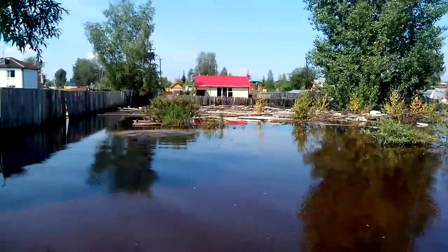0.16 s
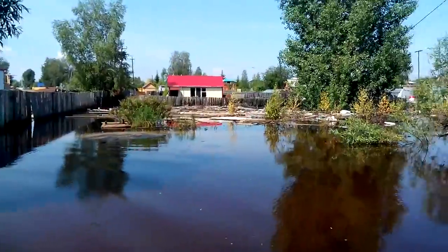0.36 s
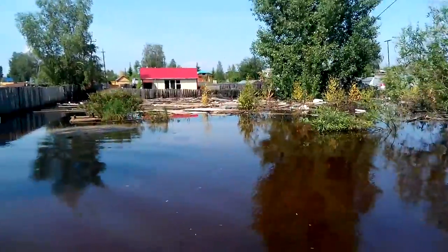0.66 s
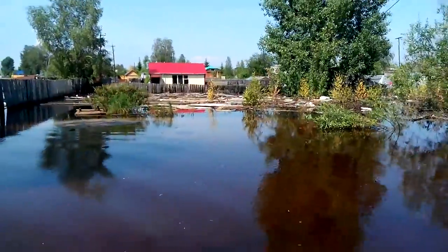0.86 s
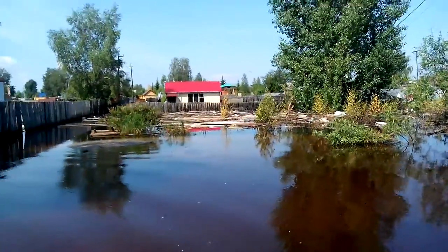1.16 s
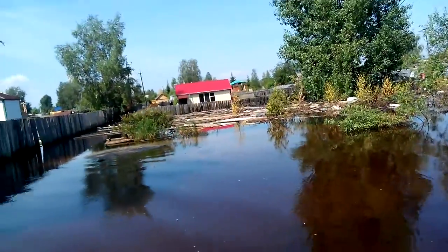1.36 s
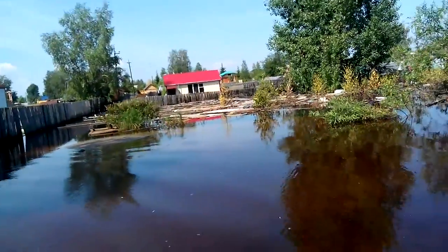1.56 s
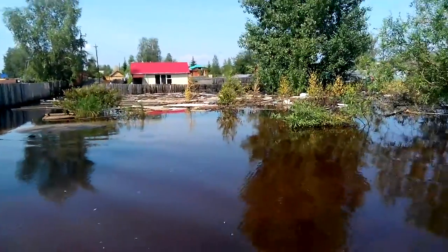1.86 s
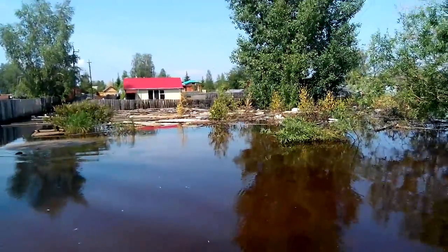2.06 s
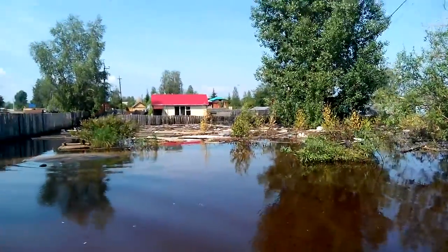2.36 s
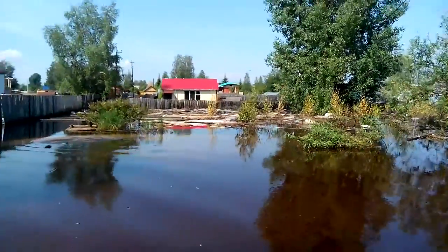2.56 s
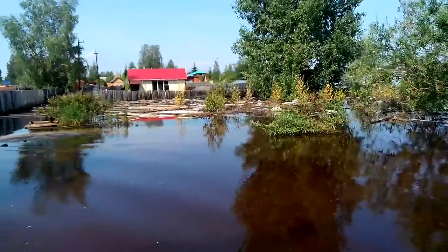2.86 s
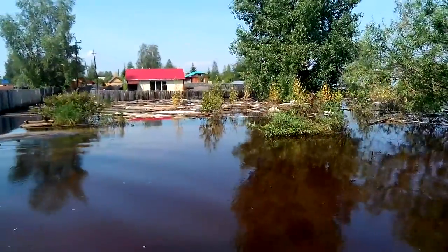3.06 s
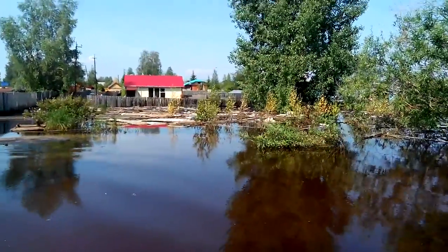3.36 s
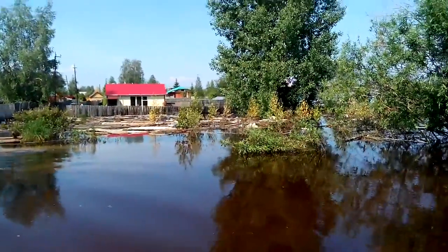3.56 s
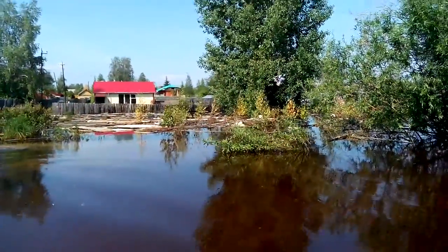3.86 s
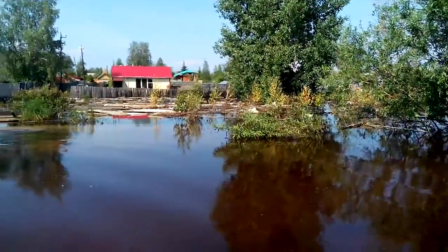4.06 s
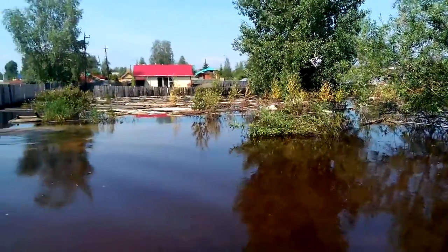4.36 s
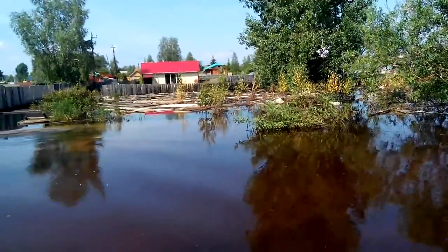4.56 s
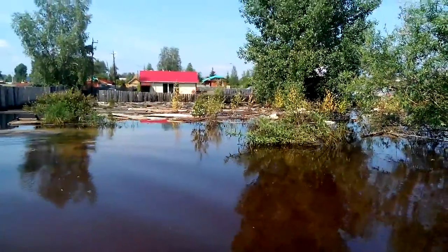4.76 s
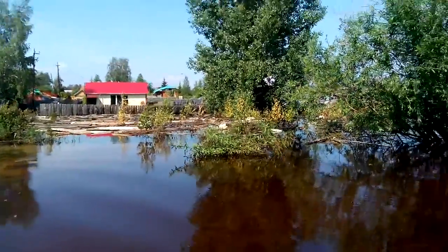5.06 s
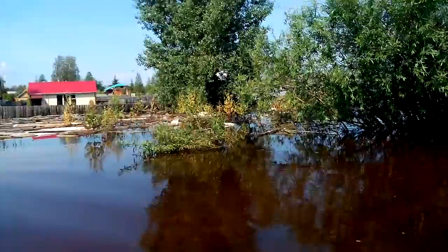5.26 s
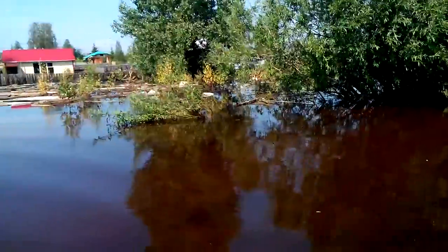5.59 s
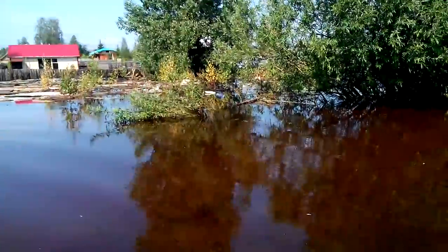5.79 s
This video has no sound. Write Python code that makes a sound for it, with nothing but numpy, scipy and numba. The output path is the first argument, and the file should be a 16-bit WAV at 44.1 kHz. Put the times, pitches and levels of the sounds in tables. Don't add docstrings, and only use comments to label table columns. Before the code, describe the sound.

Someone wades through knee-deep floodwater outdoors, eight steady strides of plunging, gurgling, churning splashes with bright drips scattered between them.

```python
import sys
import numpy as np
from scipy import signal
from scipy.fft import rfft, irfft
from scipy.io import wavfile
from scipy.ndimage import uniform_filter1d, map_coordinates
from numba import njit

SR = 44100
rng = np.random.default_rng(int(sys.argv[2]) if len(sys.argv) > 2 else 0)


def to_linear_factor(level_db):
    exponent = np.asarray(level_db, float) / 20
    return 10 ** exponent


def waveform_to_disk(signal):
    frames = np.transpose(np.atleast_2d(signal))
    scaled = np.clip(frames, -1, 1) * 32767
    samples = np.round(scaled).astype(np.int16)
    wavfile.write(sys.argv[1], SR, samples)


N = 261513


def shape(points, hz):
    f, db = np.transpose(points)
    return to_linear_factor(np.interp(np.log(np.maximum(hz, 1)), np.log(f), db))


def hiss(points):
    x = irfft(rfft(rng.standard_normal(N)) * shape(points, np.fft.rfftfreq(N, 1 / SR)), N)
    return x / np.std(x)


def walk(rate_hz):
    hold = int(SR / rate_hz)
    steps = np.repeat(rng.standard_normal(N // 40), hold)[:N]
    return uniform_filter1d(uniform_filter1d(steps, hold), hold // 2)


def at(curve, when):
    return curve[(when * N).astype(int)]


# freq_hz, level_db
CAPSULE_COLOUR = [(30, -16.5), (150, -8.5), (400, -3), (1900, 5.5), (4500, 2), (5600, 2.5), (6350, 5.5),
                  (7000, -4), (8000, -11), (11000, -17.5), (15500, -22), (20000, -21)]


def capsule(x):
    cep = irfft(np.log(shape(CAPSULE_COLOUR, np.fft.rfftfreq(2048, 1 / SR))))
    cep[1:1024] *= 2
    cep[1025:] = 0
    return signal.fftconvolve(x, irfft(np.exp(rfft(cep)))[:512])[:N]


@njit
def ring(n, start, hz, cycles, rise, size, swell):
    out = np.zeros(n)
    for e in range(len(start)):
        tau = cycles[e] * SR / hz[e] / 4
        step, glide, phase = 2 * np.pi * hz[e] / SR, 2 ** (rise[e] / (4 * tau)), 0.
        for i in range(min(int(8 * tau), n - start[e])):
            u = i / tau
            out[start[e] + i] += size[e] * u ** swell * np.exp(1.5 * (1 - u)) * np.sin(phase)
            phase += step
            step = min(step * glide, 2.8)
    return out


def bubbles(s, hz, cycles, rise_oct, size, swell=1.5):
    rise_oct = rise_oct + 0 * s
    cycles = np.maximum(cycles, .5) + 0 * s
    start = (s * SR).astype(np.int64)
    return ring(N, start, hz * 2 ** (-rise_oct / 4), cycles, rise_oct, size, max(1. * swell, .1))


def lone_bubbles(s, db, hz, cycles, rise_oct):
    return bubbles(s, hz, cycles, rise_oct, to_linear_factor(db) / shape(CAPSULE_COLOUR, hz))


def slaps(s, db, decay_s, colour):
    strike, u = np.zeros(N), np.arange(500) / (decay_s * SR)
    strike[(s * SR).astype(int)] = to_linear_factor(db)
    return np.convolve(strike, u * np.exp(1 - u))[:N] * hiss(colour)


def tent(t, start, end, db, rise, fall):
    t = t[:, None]
    return np.sum(to_linear_factor(db - rise * np.maximum(start - t, 0) - fall * np.maximum(t - end, 0)) ** 2, axis=1)


HOLLOW_RISE_DB_S, HOLLOW_FALL_DB_S, WAKE_FALL_DB_S = 456, 185, 217
# start_s, end_s, level_db, sag_db_per_s
WAKE_ROLLS = [
    (0.0, 0.234, -43.5, -2),
    (0.74, 1.127, -42.5, 38),
    (1.388, 1.82, -41, 16.5),
    (2.26, 2.58, -42.5, 27),
    (2.98, 3.269, -41.5, 4),
    (3.717, 4.06, -43, 2.5),
    (4.48, 4.85, -42.5, -1),
    (5.208, 5.65, -43.5, 20),
]


def wakes(t):
    start, end, db, sag = np.transpose(WAKE_ROLLS)
    return tent(t, start, end, db - sag * (t[:, None] - start), HOLLOW_RISE_DB_S, WAKE_FALL_DB_S)


SPRAY_DB, SPRAY_PER_MIST = 8, 0.41
STEEPNESS_RATIO = (0.98, 1.12, 1.11)
CREST_HOLD_S = (0.026, 0.057, 0.03)
# crest_s, level_db, mist_share_db, rise_db_per_s, fall_db_per_s
WAVE_CRESTS = [
    (0.101, -31.5, -12.5, 108, 57.5),
    (0.849, -34.5, -18, 80, 58),
    (1.64, -32.5, -12, 67, 65),
    (2.375, -32.5, -22, 109, 90),
    (3.17, -31.5, -11.5, 87, 72),
    (3.928, -32, -20, 75, 76),
    (4.76, -33.5, -6, 78, 87),
    (5.454, -33, -20, 98, 100),
]


def waves(t):
    crest, db, mist_db, rise, fall = np.transpose(WAVE_CRESTS)
    shares = (0, SPRAY_DB + SPRAY_PER_MIST * mist_db, mist_db)
    return [tent(t, crest - hold / 2, crest + hold / 2, db + share, rise * steep, fall * steep)
            for share, steep, hold in zip(shares, STEEPNESS_RATIO, CREST_HOLD_S)]


RUNOFF_RISE_DB_S, RUNOFF_FALL_DB_S = 231, 265
# start_s, end_s, level_db, spray_share_db, mist_share_db
LEG_RUNOFF = [(0.187, 0.335, -47.5, 9, -4), (0.438, 0.45, -48, -12, -18), (0.945, 1.214, -47.5, -7, -16.5),
              (1.477, 1.566, -38.5, -13, -20), (1.73, 1.832, -47.5, 8.5, -6.5), (1.91, 1.99, -50, -18, -12),
              (2.034, 2.078, -55.5, 10, -13), (2.512, 2.604, -42, 2, -18.5), (2.632, 2.686, -48, -1, -17.5),
              (2.797, 2.874, -52, 8.5, -14.5), (3.244, 3.352, -49.5, -1, -9), (3.385, 3.456, -55.5, 11, -2),
              (3.503, 3.583, -52.5, 4, -14), (3.82, 3.857, -39, -4, -17), (4.008, 4.15, -44.5, 3.5, -10),
              (4.134, 4.194, -40, -2, -17), (4.44, 4.56, -41.5, -16, -34), (4.592, 4.667, -38.5, 5.5, -21),
              (4.887, 5.016, -42.5, 2, -14.5), (5.08, 5.08, -41, -10, -21), (5.166, 5.29, -44.5, -4, -37),
              (5.507, 5.705, -47.5, -4, -16.5)]


def runoff(t):
    start, end, db, spray_db, mist_db = np.transpose(LEG_RUNOFF)
    return [tent(t, start, end, db + share, RUNOFF_RISE_DB_S, RUNOFF_FALL_DB_S)
            for share in (0, spray_db, mist_db)]


PLUNGE_RISE_DB_S, PLUNGE_FALL_DB_S = 1500, 68
# start_s, level_db, spray_share_db, mist_share_db
LEG_PLUNGES = [
    (0.531, -36.5, -2.5, -26.5),
    (1.237, -36.5, 1, -25),
    (1.303, -38.5, -1.5, -22),
    (2.07, -48.5, 3.5, -32),
    (2.87, -36, -5.5, -32),
    (3.59, -41.5, -3, -41),
    (4.358, -41.5, 7, -32),
    (5.11, -48, 6.5, -13),
    (5.883, -38.5, -6, -25),
    (5.915, -41.5, 3.5, -35),
]


def plunges(t):
    start, db, spray_db, mist_db = np.transpose(LEG_PLUNGES)
    return [tent(t, start, start, db + share, PLUNGE_RISE_DB_S, PLUNGE_FALL_DB_S * steep)
            for share, steep in zip((0, spray_db, mist_db), STEEPNESS_RATIO)]


# opens_s, level_db, length_s
LEG_HOLLOWS = [(0.56, -49, 0.043), (0.662, -37, 0.029), (1.332, -43, 0.048), (2.128, -39.5, 0.061),
               (2.93, -37.5, 0.033), (3.514, -50, 0.091), (3.64, -41, 0.091), (4.444, -43.5, 0.032),
               (4.95, -48, 0.014), (5.106, -50, 0.013), (2.772, -55, 0.044), (5.255, -44.5, 0.18),
               (5.925, -52, .1)]


def hollows(t):
    opens, db, length = np.transpose(LEG_HOLLOWS)
    return tent(t, opens, opens + length, db, HOLLOW_RISE_DB_S, HOLLOW_FALL_DB_S)


# hollow_db, churn_db, spray_db, mist_db
STILL_DB = (-62.5, -102.5, -53, -68)


def stirring(t):
    ms = np.arange(0, t[-1] + .01, .001)
    power = [hollows(ms) + wakes(ms)]
    power += [sum(parts) for parts in zip(plunges(ms), waves(ms), runoff(ms))]
    return np.array([np.interp(t, ms, 10 * np.log10(p + to_linear_factor(still) ** 2)) for p, still in zip(power, STILL_DB)])


HEAVE_SHARE = (0.89, 0.63, 0.8, 0.84)


def heaving(t):
    surge_db = 0.43 * walk(32) + 2.08 * walk(70)
    calm_db = stirring(t)
    stir_db = np.array([db + share * surge_db + 1.2 * walk(30) for db, share in zip(calm_db, HEAVE_SHARE)])
    ebb_db = 110 * t
    return np.maximum.accumulate(stir_db + ebb_db - calm_db, axis=1) - ebb_db + calm_db - 0.8


# pitch_hz, bubbles_db, hiss_db
SIZE_CLASSES = [
    (446, 0.5, -4),
    (1570, -10, -13),
    (3720, -8.5, -13),
    (8700, 11, 3.5),
]


def birth_levels(tone, when, stir_db):
    hz, crowd_db, _ = np.transpose(SIZE_CLASSES)
    place = np.interp(np.log(tone), np.log(hz), np.arange(4))
    birth_db = map_coordinates(stir_db + crowd_db[:, None], [place, when * (N - 1)], order=1)
    hollow_db = at(np.minimum(stir_db[0] - np.maximum(stir_db[1], -46), 4), when)
    birth_db = birth_db + 0.75 * hollow_db * np.maximum(np.log2(hz[0] / tone), 0)
    thin_db = at(np.minimum(stir_db[3] + 54, 0), when)
    birth_db = birth_db + 2.2 * thin_db * np.maximum(np.log2(tone / hz[-1]), 0)
    clouds = rng.standard_normal((24, 240))
    return birth_db + 3.0 * map_coordinates(clouds, [np.log2(tone / 150) * 3, when * 239], order=1)


def swarm(stir_db, births_per_s, cycles, scatter_db):
    when, pitch, life, climb, big = rng.random((60000, 5))[:int(births_per_s * N / SR)].T
    tone = 160 + 15300 * pitch ** 1.15
    db = birth_levels(tone, when, stir_db) + scatter_db * np.minimum(-np.log(1 - big), 4.0)
    size = to_linear_factor(db) * np.minimum(tone / 360, 1) ** 2.26
    cycles = cycles * np.minimum(tone / 900, 1) ** 0.05 * (0.74 + 2.73 * life ** 3)
    crowd = np.array([when * N / SR, tone, cycles, 0.69 * climb ** 1.34, size])
    deep = tone < 1000
    water = bubbles(*crowd[:, deep], swell=1.18) + bubbles(*crowd[:, ~deep], swell=0.41)
    hz, _, hiss_db = np.transpose(SIZE_CLASSES)
    for k, (lo, hi) in enumerate(zip([240, *hz[:-1]], [*hz[1:], 20000])):
        band = [(lo / 2, -70), (lo, -16), (hz[k], 0), (hi, -16), (hi * 2, -70)]
        water = water + to_linear_factor(stir_db[k] + hiss_db[k]) * hiss(band)
    return water


def rumble(hollow_db):
    low = hiss([(20, -18), (45, -3), (100, -2.0), (190, 1.0), (260, -3.0), (400, -59)])
    return low * to_linear_factor(0.53 * uniform_filter1d(hollow_db, 3000) - 39.5 + 5.5 * walk(36))


OUTDOORS_DB = -76
# freq_hz, density_db_per_hz
OUTDOOR_COLOUR = [(18, -59), (30, -5), (170, -28), (632, 45), (1860, -4), (5170, -11), (6210, -18),
                  (8080, -29), (14800, -70), (16000, -59)]


def outdoors():
    return hiss(OUTDOOR_COLOUR) * to_linear_factor(OUTDOORS_DB)


# start_s, peak_db, brightness_db
SPRAY_TICKS = [(0.0094, -32.5, -17), (0.0374, -41, -13), (0.0781, -43, -20), (0.1264, -39, -16),
               (0.183, -32, -21), (0.2412, -31, -16), (0.248, -28, -13), (0.2704, -33, -19),
               (0.2848, -33, -28), (0.3158, -29, -24), (0.3391, -41, -18), (0.3614, -35, -18),
               (3.524, -38, -30), (0.4105, -50, 1), (0.5043, -55, -26), (3.5203, -35, -25),
               (0.828, -36, -24), (0.863, -35.5, -23), (1.5333, -37, -25), (1.5826, -34, -20),
               (1.6112, -27, -21), (1.7827, -30, -21), (1.804, -32, -19), (1.8501, -36, -19),
               (2.5194, -50, -16), (2.677, -43, -15), (2.8927, -40, -27), (3.078, -32, -20),
               (3.1526, -40, -23), (3.204, -29, -26), (3.2345, -31, -25), (3.2778, -32.5, -25),
               (3.344, -41, -22), (3.439, -37, -25), (3.503, -40, -20), (3.788, -36, -26),
               (3.931, -34, -18), (3.976, -35, -26), (4.097, -36, -16), (4.3687, -43, -18),
               (4.529, -47, -21), (4.7051, -42, -11), (5.0845, -40, -27), (5.634, -41, -10),
               (5.665, -45, -30)]


def spray(mist_db):
    when, big = rng.random((2, 150))
    haze_db = at(mist_db, when)
    fine_db = haze_db + 0.45 * np.minimum(haze_db + 57, 0) + 9 + 5.3 * np.minimum(-np.log(1 - big), 2.5)
    s, db, bright_db = np.transpose(SPRAY_TICKS)
    tick = slaps(s, db + 3, 0.00095, [(3000, -28), (6000, -1), (9500, 6.5), (13000, -28)])
    edge = slaps(s, db + bright_db + 21, 0.0007, [(8000, -40), (11500, 0), (16000, -3)])
    patter_colour = [(400, -60), (1500, -8), (5000, 2.5), (9000, 10.5), (14000, -6.0)]
    return tick + edge + slaps(when * N / SR, fine_db, 0.0023, patter_colour)


DROP_CYCLES, DROP_RISE_OCT, SLAP_DECAY_S = 8.5, 0.032, 0.0007
DRIP_SLAP_DB = -28
# start_s, peak_db, pitch_hz, slap_above_8khz_db
SURFACE_DROPS = [(0.0265, -15.5, 6200, -45), (0.0955, -20, 6300, -34.5), (0.2019, -24, 5330, -39),
                 (0.53, -30, 3500, -65), (0.8231, -20, 3820, -56), (0.9067, -18.5, 6200, -56),
                 (1.002, -25, 4900, -63), (1.174, -32, 5300, -55), (1.2415, -11, 5730, -48),
                 (1.605, -20, 5660, -44), (1.6249, -15.5, 6130, -34.5), (1.747, -16, 4880, -40),
                 (1.866, -24, 3800, -61), (1.976, -40, 6040, -51), (1.9857, -26.5, 4130, -55),
                 (2.365, -40, 5000, -46), (2.637, -26.5, 5530, -58), (2.871, -30, 4140, -49.5),
                 (3.4868, -25.5, 5900, -62), (3.5223, -24, 5700, -47), (3.5956, -26.5, 3470, -68),
                 (4.0722, -15, 6840, -33), (4.386, -18.5, 5670, -48), (4.6787, -17, 6500, -44),
                 (4.727, -15, 4750, -56), (4.7416, -5, 6330, -42), (4.97, -24, 3700, -44),
                 (5.019, -14, 6480, -39), (5.3881, -20, 5800, -46), (5.8424, -37.5, 3840, -64)]
# start_s, peak_db, pitch_hz
MORE_DROPS = [(0.2247, -19.5, 3620), (.312, -23.5, 3200), (0.3755, -28, 3060), (1.6713, -21, 3500),
               (1.815, -26, 3120), (1.874, -28, 6400), (1.885, -26, 5870), (2.323, -26, 4600),
               (2.473, -25.5, 3440), (3.107, -20, 6200), (3.7946, -27, 3850), (3.9934, -29, 3640),
               (4.133, -26, 3780), (4.157, -32, 3720), (4.8606, -28, 4740), (4.919, -22.5, 5660),
               (0.2712, -25, 6160), (0.2837, -22, 5400), (0.7281, -35, 4600), (1.0968, -27.5, 6310),
              (1.5423, -29, 6190), (1.5667, -38, 3750), (3.0513, -25, 6480), (3.1475, -20.5, 3500),
              (3.404, -26.5, 6200), (3.6903, -36, 3920), (3.8228, -34, 3250), (3.8391, -24.5, 6550),
              (4.172, -32, 3100), (4.354, -44, 3580), (4.369, -36, 5750), (4.4096, -25.5, 3260),
              (4.4414, -25.5, 3620), (4.609, -27, 3800), (4.7146, -31, 6310), (4.768, -14, 6400),
              (4.7578, -12, 6000), (4.794, -13, 6000), (0.834, -21.5, 5300), (5.3417, -37, 3250),
              (5.5976, -33, 3260), (5.6835, -36, 3190)]


def drops():
    light = [(*drip, drip[1] + DRIP_SLAP_DB) for drip in MORE_DROPS]
    s, db, hz, slap_db = np.transpose([*SURFACE_DROPS, *light])
    slap = slaps(s, slap_db + 19, SLAP_DECAY_S, [(400, -56), (1500, -21), (4000, 2.5), (9000, 3), (16000, -5)])
    return slap + lone_bubbles(s, db, hz, DROP_CYCLES, DROP_RISE_OCT)


# start_s, peak_db, pitch_hz, cycles
CHURN_PLOPS = [(0.0325, -22, 2470, 6.3), (0.0638, -27, 1740, 7.1), (0.1263, -22.5, 1840, 16),
               (0.247, -26.5, 1330, 7.5), (0.4324, -36, 1280, 8.9), (0.5426, -28.5, 1480, 6.1),
               (0.9443, -28.5, 1690, 14), (0.9694, -25, 1090, 15), (1.195, -30.5, 2720, 8.2),
               (1.2366, -26, 1880, 5.5), (1.294, -30.5, 1820, 14), (1.6327, -20, 1190, 5.2),
               (1.7466, -18, 2270, 2.5), (1.7579, -20.5, 1610, 5.8), (2.0632, -34.5, 1490, 7.5),
               (2.594, -24, 920, 2.8), (2.8704, -26.5, 1420, 5.6), (2.8938, -24.5, 1800, 8),
               (2.9322, -27.5, 2130, 10), (3.1802, -23, 1360, 9), (4.0365, -23.5, 2230, 9),
               (4.0717, -28, 2510, 16), (4.0975, -25, 1900, 10), (4.134, -22.5, 2640, 14),
               (4.376, -25.5, 2680, 9.1), (4.9255, -24.5, 2640, 12), (5.29, -28.5, 2230, 10),
               (5.3697, -21.5, 2070, 8.2), (5.4221, -23.5, 2200, 11), (5.8426, -35, 1870, 2.9)]


def plops():
    return lone_bubbles(*np.transpose(CHURN_PLOPS), rise_oct=0.033)


# start_s, peak_db, pitch_hz, cycles
GURGLE_BLIPS = [(0.099, -20, 1910, 11), (0.166, -25, 930, 8.1), (0.518, -36, 1740, 7),
                (0.682, -19.5, 740, 6.7), (0.999, -26, 1630, 8.4), (1.008, -27.5, 884, 8.7),
                (1.018, -28, 1280, 9.5), (1.311, -17.5, 2180, 6.3), (1.454, -27, 1250, 7),
                (1.472, -22, 1660, 6), (1.554, -21, 1210, 8.5), (1.605, -20, 2340, 8.1),
                (1.797, -21, 3000, 7), (1.873, -21, 2070, 7), (1.91, -28, 1990, 9.7),
                (1.95, -34, 1010, 5.6), (1.976, -35, 814, 8.7), (2.253, -34, 800, 5.4),
                (2.297, -28, 930, 15), (2.345, -32, 1900, 7), (2.473, -24, 2622, 7.9),
                (3.052, -21, 2790, 8.6), (3.113, -18, 1630, 7.6), (3.146, -18.5, 1440, 11),
                (3.407, -25, 1810, 7.7), (3.427, -29, 1960, 7.9), (3.768, -25, 1740, 7),
                (3.864, -21, 1700, 8.8), (3.908, -18, 1810, 8.4), (3.93, -35, 2150, 6.4),
                (4.353, -39, 2570, 5), (4.4, -21.5, 1800, 10), (4.411, -26, 1570, 7),
                (4.575, -22.5, 1340, 8.1), (4.681, -24, 1310, 11), (4.715, -31, 1750, 7),
                (4.759, -21, 2580, 7), (4.995, -27, 2780, 6.5), (5.195, -22, 1700, 7),
                (5.282, -24, 2250, 8.1), (5.39, -19, 1880, 8.3), (5.462, -29, 900, 8.1),
                (5.558, -25.5, 964, 8.4), (5.889, -35, 880, 13)]


def blips():
    return to_linear_factor(-6.5) * lone_bubbles(*np.transpose(GURGLE_BLIPS), rise_oct=0.078)


# start_s, peak_db, pitch_hz, cycles
LOW_GURGLES = [(0.63, -36, 347, 8.5), (0.744, -37, 487, 3.9), (0.766, -37.5, 404, 5), (3.619, -39, 549, 3),
               (3.645, -31, 413, 2.9), (3.709, -35, 674, 4.2), (3.744, -29.5, 654, 5),
               (4.592, -37, 496, 5.5), (4.645, -34, 594, 5.4), (5.106, -37, 780, 4.3),
               (5.308, -38, 664, 6.3), (5.339, -39, 650, 5), (5.419, -42, 587, 4), (0.215, -31, 562, 11)]


def gurgles():
    return lone_bubbles(*np.transpose(LOW_GURGLES), rise_oct=0.18)


# start_s, peak_db, pitch_hz, cycles
BIG_GULPS = [(0.534, -37.5, 630, 4.9), (0.587, -29.5, 516, 5.2), (0.652, -29.5, 424, 7.9),
             (0.681, -27, 400, 3.7), (0.703, -23.5, 423, 2.7), (1.31, -32.5, 466, 5.3),
             (1.336, -28.5, 410, 2.9), (1.404, -25.5, 426, 4.7), (1.718, -34.5, 375, 6.1),
             (2.118, -27, 700, 6.6), (2.152, -27, 490, 5.6), (2.178, -30, 464, 3.9), (2.429, -38, 515, 6.9),
             (2.87, -23, 885, 3.1), (2.948, -23.5, 417, 7.4), (2.968, -26.5, 383, 7),
             (3.001, -26.5, 444, 7.8), (3.074, -34, 840, 12), (3.601, -34, 637, 12), (3.682, -33, 540, 3.3),
             (3.769, -27, 414, 2.3), (3.975, -27, 586, 7.7), (4.432, -28, 473, 5.4), (4.474, -28, 880, 14),
             (4.665, -30.5, 488, 10.5), (4.852, -34, 507, 9.2), (5.227, -33, 417, 2.2),
             (5.273, -34, 417, 4.6), (5.891, -37, 560, 4.9), (5.911, -25, 606, 4)]


def gulps():
    return lone_bubbles(*np.transpose(BIG_GULPS), rise_oct=0.014)


# start_s, peak_db, pitch_hz, cycles
DEEP_SLOSHES = [(0.654, -33, 273, 2.8), (1.378, -34.5, 245, 4.9), (1.528, -39, 286, 3.9),
                (2.118, -34.5, 296, 4.4), (2.767, -55, 240, 7.2), (3.669, -37, 269, 5.1),
                (3.739, -45, 310, 4.6), (4.43, -32, 370, 6), (4.575, -38.5, 238, 7.4), (4.7, -41, 230, 7),
                (4.966, -41.5, 295, 13), (5.269, -42, 310, 4.5), (5.418, -49, 240, 5)]


def sloshes():
    return lone_bubbles(*np.transpose(DEEP_SLOSHES), rise_oct=0.086)


# start_s, peak_db, pitch_hz
BODY_JOLTS = [(.66, -53, 90), (1.89, -61, 110), (1.381, -61, 148), (1.53, -54, 154), (1.708, -56, 151),
              (2.093, -47, 80), (2.179, -46, 150), (2.357, -49.5, 113), (2.485, -51, 129),
              (2.055, -51, 130), (3.087, -39, 120), (3.166, -35, 130), (3.296, -53, 110), (1.915, -64, 80),
              (3.731, -51, 92), (3.979, -47, 131), (4.515, -42, 170), (4.65, -39, 190)]


def jolts():
    s, db, hz = np.transpose(BODY_JOLTS)
    return lone_bubbles(s, db, hz, cycles=0.023 * hz, rise_oct=0)


# start_s,
# peak_db, pitch_hz, cycles, rise_oct
AIR_BURSTS = [(0.822, -31.5, 1016, 18, 1.03), (1.045, -37.5, 960, 24, 0.23),
              (2.572, -31.5, 560, 11.4, 0.87), (2.392, -31, 1650, 24, 0.18), (7.5, -33.5, 1850, 45, 0.34),
              (3.177, -29, 1170, 11.7, 0.84), (3.429, -36, 2200, 33, 1.4), (4.6, -20, 5200, 7, -0.16),
              (4.744, -4.5, 6400, 17, -0.026), (4.7478, -9, 5600, 5.9, .02), (4.462, -34.5, 299, 23, -0.83)]


def bursts():
    return lone_bubbles(*np.transpose(AIR_BURSTS))


def scene():
    stir_db = heaving(np.arange(N) / SR)
    near = swarm(stir_db, births_per_s=6000, cycles=5.16, scatter_db=2.0)
    near = near + drops() + spray(stir_db[3]) + rumble(stir_db[0])
    near = near + plops() + blips() + gurgles() + gulps() + sloshes() + jolts() + bursts()
    return (capsule(near) + outdoors())[None]


def low_pass(x):
    return signal.sosfilt(signal.butter(12, 16460, fs=SR, output="sos"), x)


def record(dry):
    edge = [(15450, 0), (15650, -27), (16400, -31), (16550, -70)]
    mix = irfft(rfft(dry) * shape(edge, np.fft.rfftfreq(N, 1 / SR)), N)
    return low_pass(mix)


dry = scene()
out = record(dry)
waveform_to_disk(out)
```